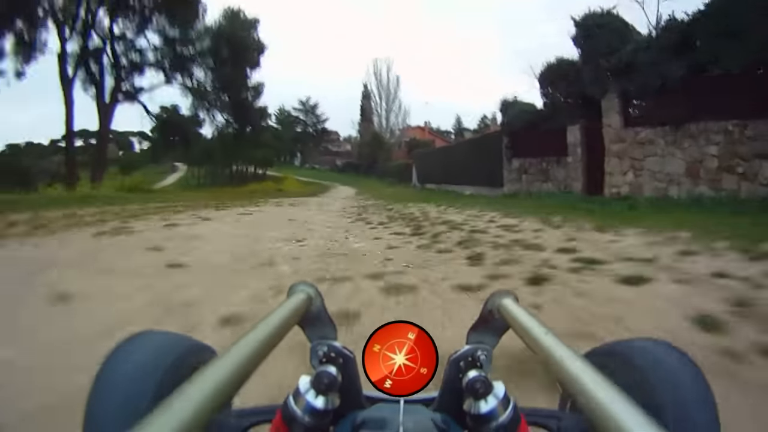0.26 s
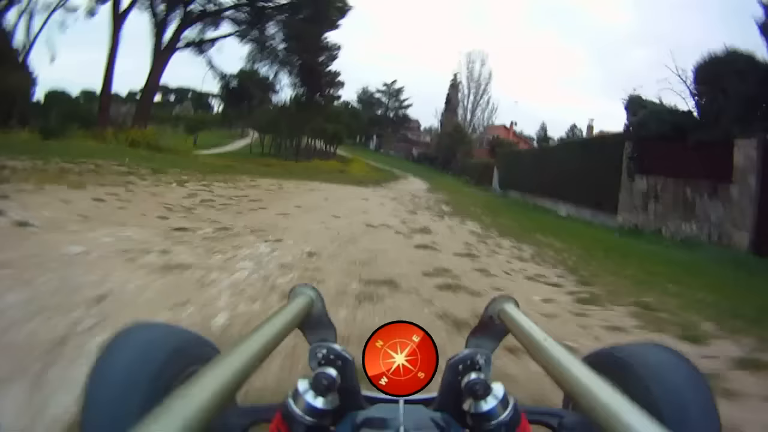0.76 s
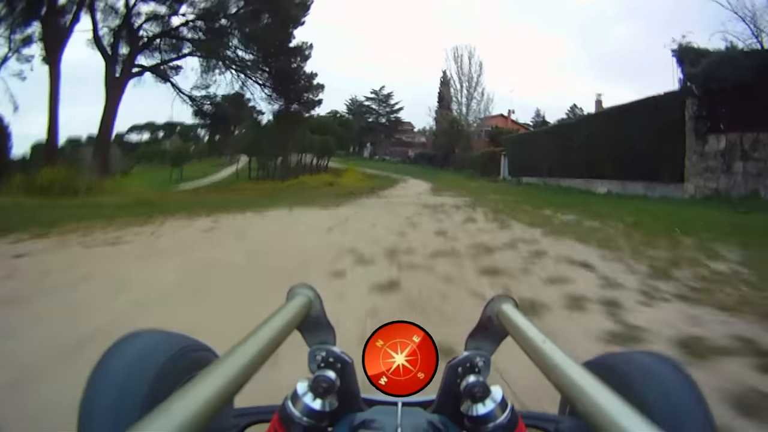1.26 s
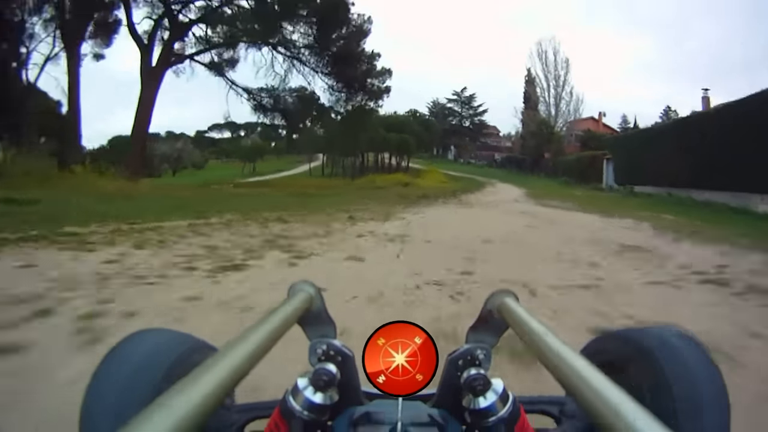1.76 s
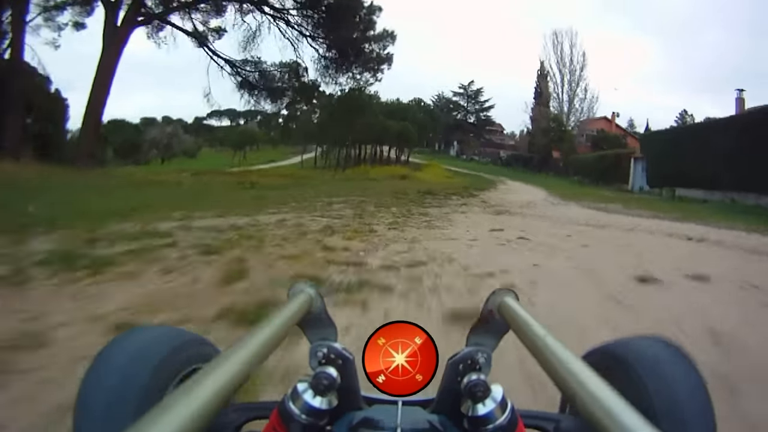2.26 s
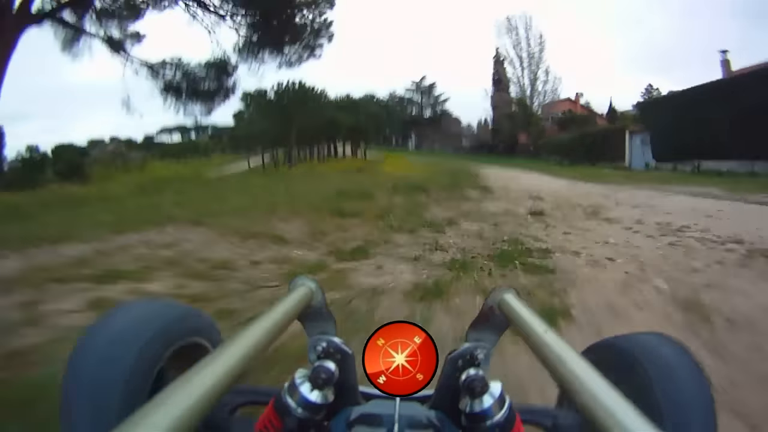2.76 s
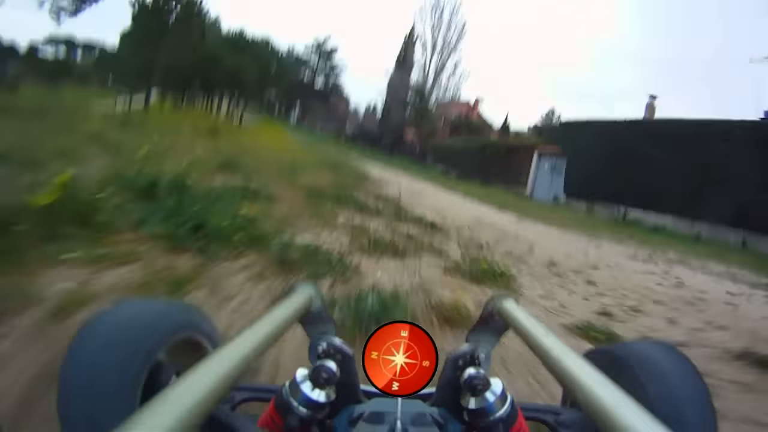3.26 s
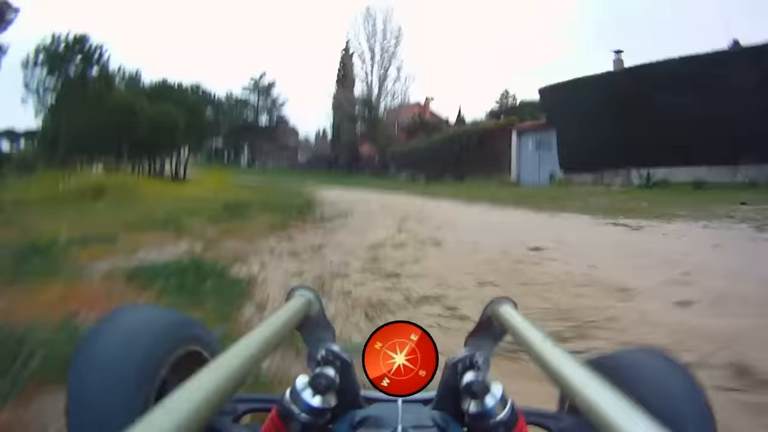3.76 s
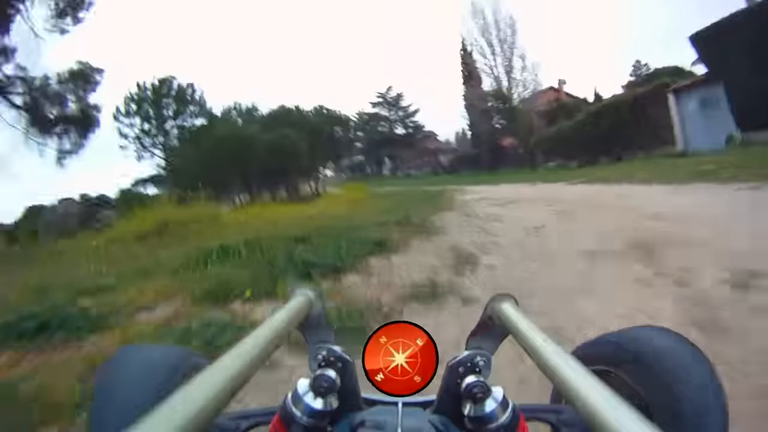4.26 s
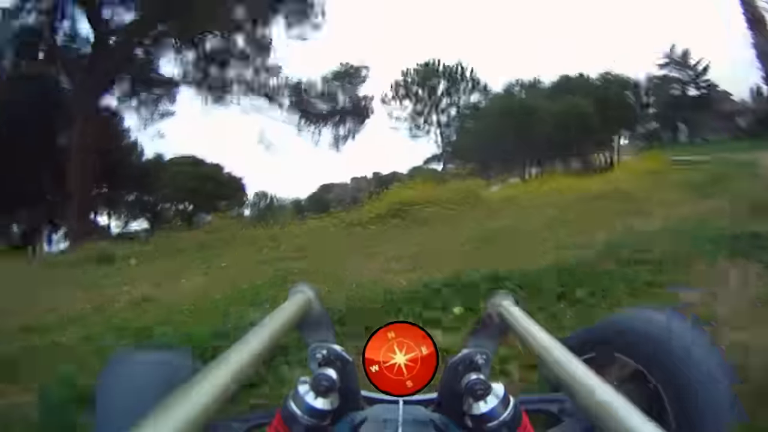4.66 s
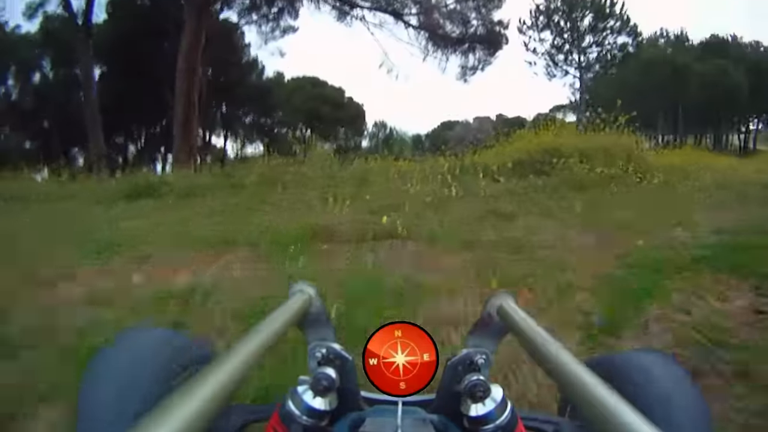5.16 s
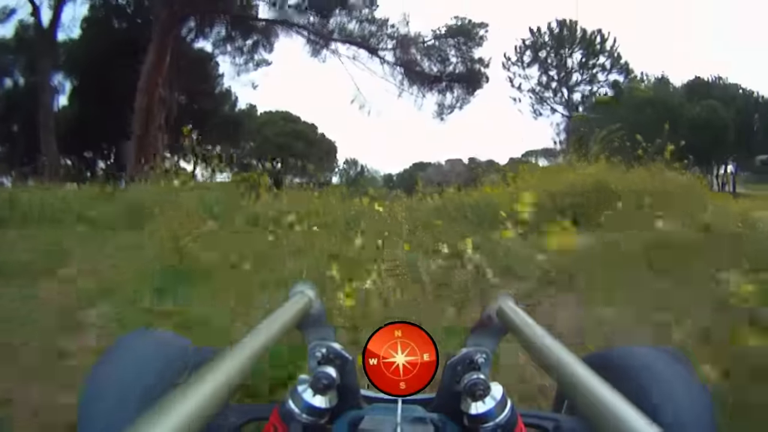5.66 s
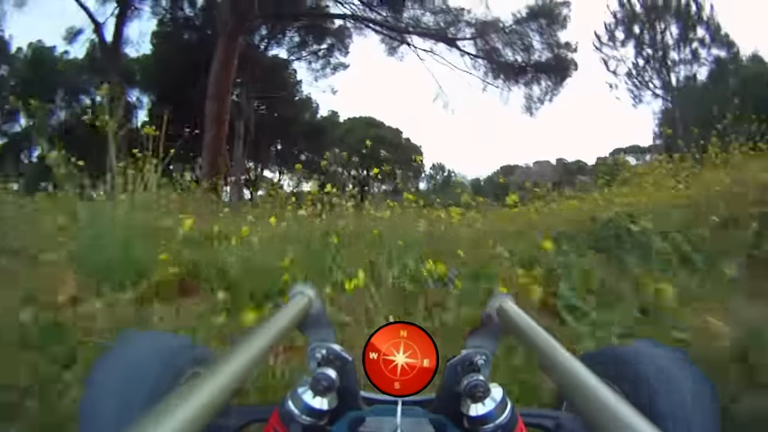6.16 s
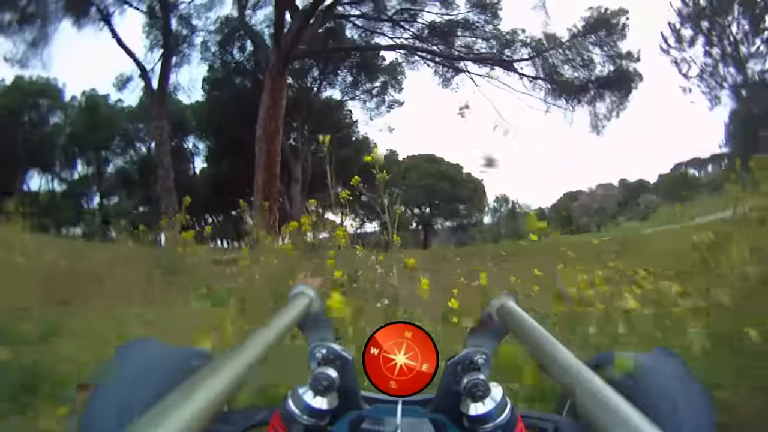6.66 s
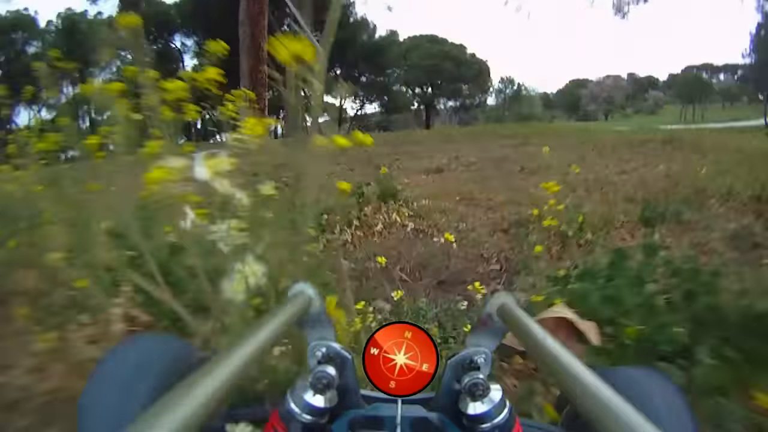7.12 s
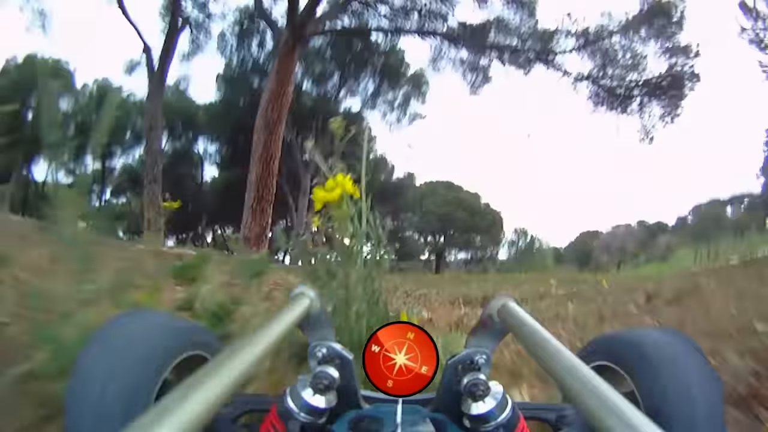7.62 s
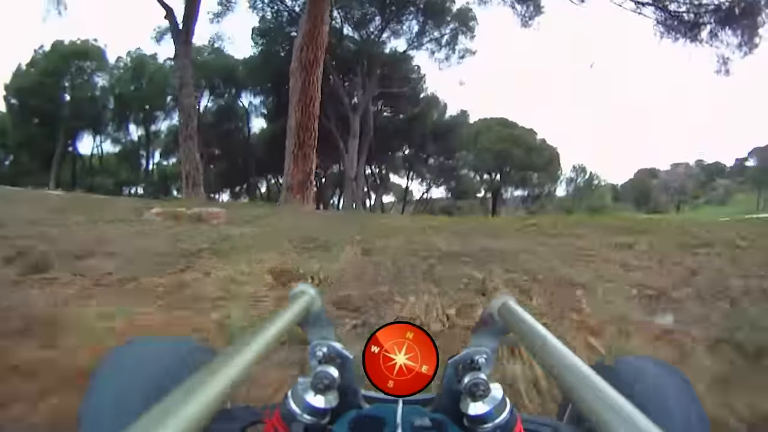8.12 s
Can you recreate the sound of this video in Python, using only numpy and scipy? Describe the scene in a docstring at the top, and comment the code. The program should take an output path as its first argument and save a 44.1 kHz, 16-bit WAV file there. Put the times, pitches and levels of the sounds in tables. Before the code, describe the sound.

Boxy, mid-heavy rumble of a small model car with plastic rattles, hollow knocks and sharp clicks on dirt, smoother on grass, then a whining rev.

```python
"""On open ground, dirt and then grass, a radio-controlled buggy races with a microphone in a sealed housing on it.
Shaped noise makes the chassis roar, a wavering tone and its overtones the gear whine, a noise band the motor buzz.
Short rings and noise bursts make the rattles, plate knocks and sharp clicks; filtered noise makes spray and wind.
The roar, clicks and parts of the rattles and knocks ring through the housing; peaks above the input limit clip."""
import sys
import numpy as np
from scipy import signal
from scipy.fft import rfft, irfft, next_fast_len
from scipy.io import wavfile
from scipy.ndimage import uniform_filter1d, map_coordinates

SR = 44100
rng = np.random.default_rng(int(sys.argv[2]) if len(sys.argv) > 2 else 0)


def master_out(mix):
    """Clip the mix to full scale and print it as 16-bit PCM to the path in sys.argv[1]."""
    frames = np.transpose(np.atleast_2d(mix))
    ceiling = np.clip(frames, -1, 1)
    pcm = np.round(ceiling * 32767).astype(np.int16)
    wavfile.write(sys.argv[1], SR, pcm)


N = 369999

# Levels and strengths in these tables are relative; the functions set the final balance.
# shaking of the chassis: (t/s, level/dB, brightness/dB)
CHASSIS_SHAKE = [(0.0, -23.5, -6.5), (0.45, -21, -8), (0.8, -20.5, -7), (1.0, -14, -3.5), (1.2, -18, -5),
                 (1.35, -18.5, -5), (1.64, -17, -3), (2.02, -17, -5), (2.25, -25.5, -7.5),
                 (2.9, -26.5, -6.5), (3.25, -27.5, -9.5), (3.7, -24.5, -7.5), (4.43, -29.5, -9),
                 (4.6, -25.5, -7), (5.0, -25, -8), (5.3, -23, -9), (5.84, -25, -9.5), (6.3, -26, -6),
                 (6.9, -22, -6), (7.5, -24, -8.5), (7.76, -20.5, -5), (8.06, -22, -4), (8.12, -23.5, -7.5),
                 (8.39, -23, -8)]
# roughness of the ground, which scales the lumps in the roar: (t/s, roughness/dB)
GROUND_BUMPS = [(0, 1.86), (2.1, 2.34), (2.3, 2.5), (4.0, 2), (4.9, 2), (5.2, 1.47), (7.7, 1.6),
                (8.39, 0.4)]
# rough patches of ground under the wheels: (middle t/s, half-length/s, swell/dB)
ROUGH_PATCHES = [(0.147, 0.055, 2.5), (0.568, 0.073, 2), (0.78, .04, 6), (1.024, 0.073, 2.5),
                 (1.108, .05, 2.5), (1.358, 0.019, 0), (1.423, 0.072, 0), (1.695, 0.029, 0),
                 (2.273, 0.013, 6.5), (2.342, 0.051, 8.5), (2.415, 0.03, 7.5), (2.501, .1, 4),
                 (2.61, 0.1, 5.5), (2.767, 0.11, 6.5), (2.87, 0.023, 10.5), (3.022, 0.11, 2),
                 (3.108, 0.12, 10.5), (3.286, 0.04, 5), (3.362, 0.027, 8), (3.437, 0.056, 7),
                 (3.609, 0.04, 6), (4.502, 0.058, 7), (4.745, 0.17, 2.5), (4.881, 0.1, 6.5),
                 (5.952, 0.04, 3), (6.08, 0.05, -0.5), (6.472, 0.15, 1.5), (7.114, 0.02, 3),
                 (7.193, 0.019, 2), (7.352, 0.19, 2)]
# gear teeth meeting: (t/s, teeth per second f/Hz, level/dB)
GEAR_MESH = [(0.0, 791, -50), (0.58, 744.6, -55.5), (0.89, 745, -43), (1.0, 783.3, -39.5),
             (2.12, 791, -46.5), (2.8, 802, -58), (3.1, 940, -54.5), (3.6, 950, -47), (4.28, 835, -57.5),
             (4.7, 938.8, -44.5), (4.75, 860, -37.5), (4.83, 890, -39), (5.16, 897, -56.5),
             (5.28, 930, -43), (5.58, 927, -50), (5.86, 826.7, -47.5), (6.24, 687, -43.5), (6.43, 716, -45),
             (6.52, 815, -40), (6.8, 829.4, -38.5), (6.88, 1040, -34), (6.93, 866, -37.5), (7.04, 978, -41),
             (7.4, 1143, -40), (7.51, 900, -45.5), (7.7, 845.6, -36), (7.78, 1232, -31.5),
             (7.83, 1401, -18.5), (7.93, 1480, -25), (8.02, 1593, -16), (8.08, 1620, -15.5),
             (8.09, 826, -43.5), (8.39, 801, -40.5)]
# overtones of the gear force, before the housing colours them: (multiple of f, level/dB)
GEAR_OVERTONES = [(2, -6), (3, -6), (4, -18)]
# narrow motor buzz: (t/s, level/dB)
MOTOR_BUZZ = [(0, -53.5), (1.0, -39.5), (2.0, -48.5), (4.4, -70.5), (4.6, -54), (7.5, -52.5), (8.39, -50)]
# loose parts rattling on a bump: (t/s, strength/dB, ring f/Hz)
LOOSE_RATTLES = [(0.35, -7, 1590), (0.387, -8, 1710), (0.4075, -9, 1335), (0.4812, -5, 1480),
                 (0.5607, -6, 1415), (0.637, -15, 1500), (0.661, -6, 1570), (0.6864, -5.5, 1570),
                 (0.7036, -7.5, 1510), (0.7317, -9, 1487), (0.7695, -4.5, 1500), (0.7998, -6, 1540),
                 (0.8868, -3, 1563), (0.9085, -4.5, 1560), (0.9302, -4, 1480), (0.9637, -4.5, 1580),
                 (1.1426, -9, 1610), (1.1738, -6, 1448), (1.2412, -6, 1543), (1.3057, -8, 1478),
                 (1.3524, -4, 1660), (1.4027, -5.5, 1553), (1.4388, -5, 1534), (1.493, -3.5, 1547),
                 (1.569, -5, 1452), (1.6159, -12, 1590), (1.6372, -3.5, 1580), (1.665, -1.5, 1573),
                 (1.718, -3.5, 1333), (1.7806, -8.5, 1580), (1.8302, -2, 1784), (1.8571, 1.5, 1524),
                 (1.9127, -4.5, 1600), (1.942, 0.5, 1645), (1.9916, -3.5, 1667), (2.2584, -16, 1320),
                 (2.3249, -4, 1460), (2.4085, -6.5, 1493), (2.4853, -6, 1494), (2.5207, -7.5, 1510),
                 (2.6673, -13, 1970), (2.6958, -11, 1390), (2.7639, -8, 1457), (2.865, -14.5, 1424),
                 (2.991, -6.5, 1530), (3.4171, -6, 1614), (3.6131, -10, 1546), (3.6863, -13, 1396),
                 (4.4715, -10.5, 1380), (4.7032, -8.5, 1367), (4.8243, -9, 1527), (4.8678, -11, 1370),
                 (5.17, -19.5, 1580), (5.2883, -13.5, 1360), (5.4904, -12, 1500), (6.0562, -13, 1412),
                 (6.4281, -15.5, 1524), (6.4654, -11.5, 1597), (6.7584, -12, 1482), (7.3733, -7.5, 1290),
                 (7.4554, -10.5, 1565), (7.7974, -11, 1437), (7.9578, -8.5, 1560), (8.0437, -1.5, 1865)]
# skid plate striking the ground: (t/s, strength/dB)
PLATE_KNOCKS = [(0.203, -31), (0.256, -28), (0.303, -32), (0.384, -26), (0.48, -23.5), (0.53, -25),
                (0.586, -28), (0.66, -26.5), (0.709, -21.5), (0.801, -21), (0.864, -35), (1.04, -37),
                (1.115, -23), (1.897, -33), (2.293, -25), (2.673, -28), (2.764, -23), (2.86, -31),
                (3.001, -27), (3.063, -32), (3.284, -27.5), (3.571, -28), (3.631, -27), (3.688, -23.5),
                (4.069, -38), (4.56, -30), (6.003, -36), (7.343, -36.5), (8.319, -36)]
# ringing notes of the skid plate, each varied at random per knock: (f/Hz, level/dB, time to fall 60 dB/s)
PLATE_NOTES = [(398.5, 2.5, 0.029), (313, -4.5, 0.032), (470, -5.5, 0.02)]
# hard, very short bright clicks: (t/s, strength/dB)
SHARP_CLICKS = [(0.1074, -26.5), (0.385, -30), (0.48, -18), (0.5235, -23), (0.5564, -25), (0.6105, -23.5),
                (0.6374, -24.5), (0.7343, -25), (0.7706, -15.5), (0.8004, -12), (0.834, -16.5),
                (0.9983, -15.5), (1.2416, -17), (1.6683, -16), (1.78, -20.5), (1.8289, -16.5),
                (1.8612, -17), (1.9415, -17.5), (1.9953, -18.5), (2.2588, -26), (2.3217, -21.5),
                (2.4083, -22.5), (2.4853, -24), (2.5332, -18.5), (2.6966, -29), (2.7274, -24),
                (2.7637, -21.5), (2.8667, -25), (2.9846, -28), (3.2818, -29), (3.3157, -37), (3.348, -28),
                (3.372, -24), (3.4077, -31), (3.581, -22), (3.6416, -29), (3.7756, -24.5), (4.0497, -35),
                (4.193, -39), (4.4562, -31), (4.4996, -32), (4.726, -24.5), (7.0564, -23), (7.353, -27)]
# sand and stems hitting the housing: (t/s, level/dB)
GRAVEL_LEVEL = [(0.0, -37.5), (0.72, -37), (1.0, -26.5), (1.54, -29.5), (2.12, -41), (2.6, -38.5),
                (4.28, -43.5), (6.29, -52.5), (7.69, -43), (7.9, -39), (8.1, -49.5), (8.39, -41)]
# colour of that spray: (f/Hz, level per Hz/dB)
SPRAY_COLOUR = [(2500, -33), (3600, -0.5), (4300, 2.5), (5400, -1), (6500, -7.5), (7600, -23.5),
                (10000, -26.5), (15000, -43)]
# wind of travel: (t/s, throb level/dB, rumble level/dB)
WIND_LEVELS = [(0.0, -67, -62), (0.9, -62, -62.5), (1.5, -65, -66), (3.6, -64, -63.5), (4.3, -64, -69.5),
               (5.2, -70, -75.5), (6.5, -76.5, -79.5), (7.5, -69, -71.5), (8.39, -73.5, -69.5)]
# colour of the deep wind throb: (f/Hz, level per Hz/dB)
THROB_COLOUR = [(18, -40.5), (30, -12.5), (42, 3), (58, -0.5), (68, -10.5), (90, -56.5)]
# colour of the higher wind rumble: (f/Hz, level per Hz/dB)
RUMBLE_COLOUR = [(50, -30.5), (75, -1.5), (130, 1), (200, -3.5), (250, -10.5), (350, -56.5)]
# housing resonances: (f/Hz, width/Hz, level/dB)
HOUSING_MODES = [(262, 150, -26), (412, 66, -31.5), (655, 90, -24), (877, 202, -19.5), (1118, 300, -18.5),
                 (1360, 179, -0.5), (1531, 239, 0), (1856, 460, -7.5), (2134, 390, -9.5), (2453, 273, -11),
                 (2897, 620, -15.5), (3266, 310, -21), (3757, 600, -25.5), (4853, 575, -24),
                 (5513, 495, -26.5), (6260, 850, -37), (7100, 760, -52.5), (9130, 1100, -58),
                 (9980, 930, -57), (11450, 660, -61.5), (13500, 3000, -74.5)]
# where two housing panels cancel: (f/Hz, width/Hz, depth of the power dip 0-1)
PANEL_NOTCH = (2613, 100, .75)

# the wheels spin up, then the throttle snaps shut
SPIN_FROM_S, SPIN_TO_S, SPIN_RISE_S = 7.76, 8.083, 0.062
SPIN_DB, SPIN_BRIGHT_DB, SPIN_BUZZ_DB = 6.5, 0.2, 11.5
DULLS = 0.22  # dB of brightness lost for each dB of swell
BASS_HZ, BASS_FOLLOWS = 620, 0.66  # below this the roar follows only a share of each dB of shaking
BUZZ_HZ, BUZZ_WIDTH_HZ = 5333, 350
RATTLE_T60_S = 0.031  # time to fall 60 dB
# light touches of the plate on bare dirt, until the grass
SCUFFS_PER_S, SCUFF_DB, SCUFF_SPREAD_DB, GRASS_FROM_S = 22, -37, 2.5, 4.5
THUD_DB, THUD_T60_S = 5.5, .03  # share of a knock that shakes the housing, and its time to fall 60 dB
CLICK_T60_S, CLICK_BRIGHT_DB, CLICK_DB = .005, 9.5, 6
OVERLOAD = .55  # largest amplitude the input passes
BASS_CUT_DB, TOP_HZ = 16, 15700


def chassis():
    """Tyres and drive line push the housing with noise and grit, lumpy at the pace of the bumps."""
    level_db, bright_db = shaking()
    bump_db, = curves(GROUND_BUMPS)
    lumps = amp(bump_db * (0.43 * wobble(35) + 0.66 * wobble(70) + 0.95 * wobble(160)))
    stones = grit(per_s=600, spread_db=2.5)
    push = lumps * (rng.standard_normal(N) + 0.22 * bump_db * stones)
    push /= np.sqrt(uniform_filter1d(push ** 2, size=SR // 4))  # bumps share out the energy, they add none
    push = patchy(push, depth_db=2.0)
    push = patchy(push, depth_db=2.0, size=1024)
    roar = housing(unit(push))
    bass = filtered(roar, lambda hz: 1 / (1 + (hz / BASS_HZ) ** 8))
    mean_db = level_db.mean()
    bass_db = mean_db + BASS_FOLLOWS * (level_db - mean_db)
    upper = bright(roar - bass, bright_db + 6.5)
    return amp(level_db) * upper + amp(bass_db + 0.4) * bass


def shaking():
    """Shaking level and brightness follow a slow course, with swells over rough patches and the wheelspin."""
    level_db, bright_db = curves(CHASSIS_SHAKE)
    t = np.arange(N) / SR
    swell_db = np.zeros(N)
    for s, length, db in ROUGH_PATCHES:
        near = slice(max(0, round((s - length) * SR)), round((s + length) * SR))
        swell_db[near] += db * np.cos(np.pi / 2 * (t[near] - s) / length) ** 2
    spin = spinning()
    return level_db + swell_db + SPIN_DB * spin, bright_db - DULLS * swell_db + SPIN_BRIGHT_DB * spin


def spinning():
    """The wheelspin, from 0 to 1, rises quickly and ends at once."""
    t = np.arange(N) / SR
    return np.clip((t - SPIN_FROM_S) / SPIN_RISE_S, 0, 1) * (t < SPIN_TO_S)


def gears():
    """Meeting teeth make a rough, unsteady pitch whose overtones take the housing's colour."""
    hz, level_db = curves(GEAR_MESH)
    hz = hz * (1 + .02 * wobble(12) + .022 * wobble(45) + .035 * wobble(250))
    phase = 2 * np.pi * np.cumsum(hz) / SR
    grid_hz = np.arange(0, 9000, 10)
    grid_gain = housing_gain(grid_hz)
    base_gain = np.interp(hz, grid_hz, grid_gain)
    tone = np.sin(phase)
    for multiple, db in GEAR_OVERTONES:
        colour = np.interp(multiple * hz, grid_hz, grid_gain) / base_gain
        tone += amp(db) * colour * np.sin(multiple * phase)
    runout = 1 + .4 * np.sin(phase / 8)  # an off-centre gear of eight teeth presses harder once a turn
    return amp(level_db + 3.5 + 3.2 * wobble(25) + 2.2 * wobble(120)) * runout * tone


def buzz():
    """The motor gives a narrow band of noise with a flickering level, lifted in the wheelspin."""
    level_db, = curves(MOTOR_BUZZ)
    noise = rng.standard_normal(N)
    band = filtered(noise, lambda hz: 1 / (1 + (2 * (hz - BUZZ_HZ) / BUZZ_WIDTH_HZ) ** 2))
    return amp(level_db + SPIN_BUZZ_DB * spinning() + 2.7 * wobble(40)) * unit(band)


def rattles():
    """Each bump swells into a brief ring, and loose contacts chatter through the housing."""
    force, ring = np.zeros(N + SR), np.zeros(N + SR)
    t = np.arange(SR // 10) / SR
    for s, db, hz in LOOSE_RATTLES:
        span = slice(round(s * SR), round(s * SR) + len(t))
        swell = 1 - np.exp(-(t / 0.0038) ** 2)
        shape = amp(db + 5 - 60 * t / RATTLE_T60_S) * swell
        ring[span] += shape * np.sin(2 * np.pi * hz * t)
        force[span] += shape * rng.standard_normal(len(t))
    chatter = bright(housing(force[:N]), 2.37)
    return amp(-1.5) * above(ring[:N], edge_hz=830) + amp(-5.0) * chatter


def knocks():
    """The plate gives a short hollow note and a dry thud through the housing; light scuffs fall between."""
    notes, force = np.zeros(N + SR), np.zeros(N + SR)
    t = np.arange(SR // 8) / SR
    times = np.cumsum(rng.exponential(size=100)) / SCUFFS_PER_S
    scuff_db = SCUFF_DB + SCUFF_SPREAD_DB * rng.standard_normal(len(times))
    scuffs = np.c_[times, scuff_db][times < GRASS_FROM_S]
    rise = 1 - np.exp(-(t / 0.0022) ** 2)
    for s, db in [*PLATE_KNOCKS, *scuffs]:
        span = slice(round(s * SR), round(s * SR) + len(t))
        ring = np.zeros(len(t))
        for hz, note_db, t60 in PLATE_NOTES:
            louder, sharper = rng.standard_normal(2)
            fall = amp(note_db + 2.2 * louder - 60 * t / t60)
            ring += fall * np.sin(2 * np.pi * hz * (1 + .07 * sharper) * t)
        notes[span] += amp(db) * ring * rise
        force[span] += amp(db + THUD_DB - 60 * t / THUD_T60_S) * rise
    thuds = housing(force[:N] * rng.standard_normal(N))
    return above(notes[:N], edge_hz=140) + thuds


def clicks():
    """Each click is a very short noise burst, coloured by the housing and brightened."""
    force, t = np.zeros(N + SR), np.arange(SR // 50) / SR
    for s, db in SHARP_CLICKS:
        force[round(s * SR):][:len(t)] += amp(db + CLICK_DB - 60 * t / CLICK_T60_S)
    return bright(housing(force[:N] * rng.standard_normal(N)), CLICK_BRIGHT_DB)


def gravel():
    """Many tiny random hits make a fine spray of grains on the housing."""
    level_db, = curves(GRAVEL_LEVEL)
    grains = patchy(grit(per_s=1300, spread_db=5.5), depth_db=4.5)
    spray = grains * amp(4.7 * wobble(30))
    return amp(level_db - 8.0) * unit(filtered(spray, along(SPRAY_COLOUR)))


def wind():
    """Air presses on the sealed housing in gusts, felt only in the bass."""
    throb_db, rumble_db = curves(WIND_LEVELS)
    heard = amp(throb_db) * gusty(THROB_COLOUR) + amp(rumble_db) * gusty(RUMBLE_COLOUR)
    return amp(BASS_CUT_DB) * heard  # stronger at the microphone, ahead of the bass cut


def gusty(points):
    """Noise of uneven strength, coloured by the points, stands for gusts."""
    gusts = rng.standard_normal(N) * amp(2.4 * wobble(12))
    return unit(filtered(gusts, along(points)))


def housing(x):
    """The housing rings after each push, with the ring starting as promptly as its colour allows."""
    size = 8192
    # minimum phase: fold the cepstrum (the transform of the log gain) onto its first half
    cepstrum = irfft(np.log(housing_gain(np.fft.rfftfreq(size, 1 / SR))), size)
    cepstrum[1:size // 2] *= 2
    cepstrum[size // 2 + 1:] = 0
    ring = irfft(np.exp(rfft(cepstrum)), size)[:size // 2]
    return signal.fftconvolve(x, ring / np.linalg.norm(ring))[:N]


def housing_gain(hz):
    """Steep-sided resonances add in power, two panels cancel at a notch, and the seal shuts out the bass."""
    power = sum(amp(2 * db) / (1 + (2 * (hz - c) / w) ** 2) ** 2 for c, w, db in HOUSING_MODES)
    c, w, depth = PANEL_NOTCH
    power *= 1 - depth / (1 + (2 * (hz - c) / w) ** 2)
    return np.sqrt(power / (1 + (235 / (hz + 1)) ** 8) + 1e-12)


def grit(per_s, spread_db):
    """Stones and tufts push at random moments with uneven strength."""
    hit = rng.random(N) < per_s / SR
    return unit(hit * rng.standard_normal(N) * amp(spread_db * rng.standard_normal(N)))


def patchy(x, depth_db, size=256):
    """Random patches of gain let each part shake on its own; a larger size makes narrower, longer streaks."""
    overlap = 3 * size // 4
    z = signal.stft(x, nperseg=size, noverlap=overlap)[2]
    field = uniform_filter1d(rng.standard_normal(z.shape), size=3, axis=0)  # smooth over frequency
    field = uniform_filter1d(field, size=8, axis=1)  # smooth over time
    return signal.istft(z * amp(depth_db * unit(field)), nperseg=size, noverlap=overlap)[1][:N]


def bright(x, db):
    """Raise the part of x above the main resonances by db."""
    high = filtered(x, lambda hz: 1 / (1 + (1780 / (hz + 1)) ** 16))
    return x + (amp(db) - 1) * high


def above(x, edge_hz):
    """Take the bass below an edge out of x."""
    return filtered(x, lambda hz: 1 / (1 + (edge_hz / (hz + 1)) ** 6))


def along(points):
    """Make a gain curve through (f/Hz, level/dB) points on a log frequency axis."""
    f, db = np.transpose(points)
    return lambda hz: amp(np.interp(np.log(hz + 1), np.log(f), db, -120, -120))


def filtered(x, response):
    """Multiply the spectrum of x by a response of frequency."""
    m = next_fast_len(N + 8192, real=True)
    return irfft(rfft(x, m) * response(np.fft.rfftfreq(m, 1 / SR)), m)[..., :N]


def wobble(rate):
    """Make a smooth random curve with rate knots a second."""
    knots = rng.standard_normal(int(N * rate / SR) + 4)
    return map_coordinates(knots, [np.arange(N) * rate / SR])


def curves(rows):
    """Give one value per sample for each column after the time."""
    s, *columns = np.transpose(rows)
    return [np.interp(np.arange(N) / SR, s, column) for column in columns]


def amp(db):
    """Turn decibels into an amplitude factor."""
    return 10 ** (np.asarray(db) / 20)


def unit(x):
    """Scale x to an average (RMS) strength of one."""
    return x / np.sqrt(np.mean(x ** 2) + 1e-20)


def scene():
    """Everything sounds together at the microphone."""
    machine = chassis() + gears() + buzz()
    short_sounds = rattles() + knocks() + clicks()
    return (machine + short_sounds + gravel() + wind())[None]


def record(dry):
    """The input clips hard; then the bass is thinned and nothing is kept above the band limit."""
    clipped = np.clip(dry, -OVERLOAD, OVERLOAD)
    bass_gain = lambda hz: amp(-BASS_CUT_DB / (1 + (hz / 230) ** 6))
    return filtered(clipped, lambda hz: bass_gain(hz) * (hz < TOP_HZ))


dry = scene()
out = record(dry)
master_out(out)
```